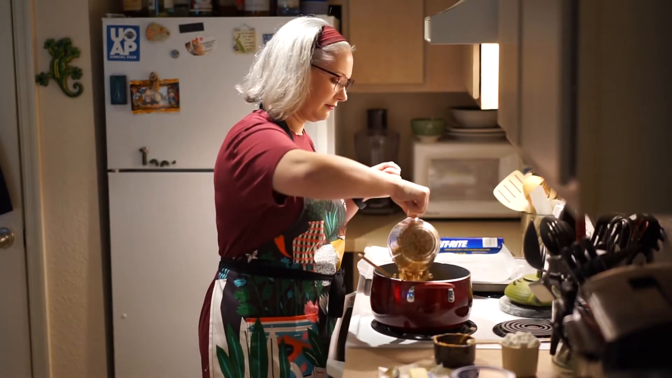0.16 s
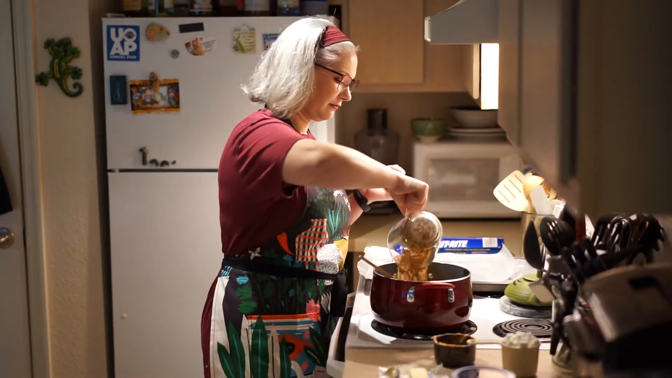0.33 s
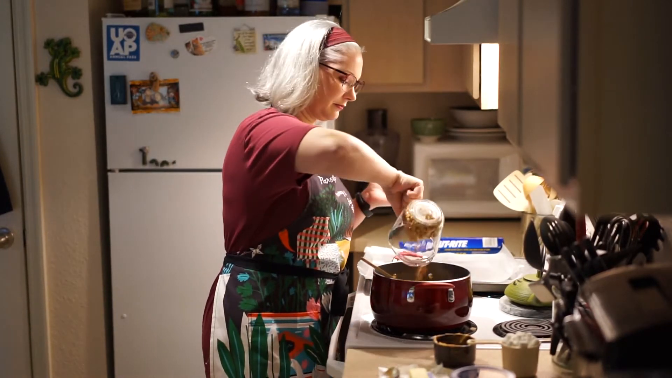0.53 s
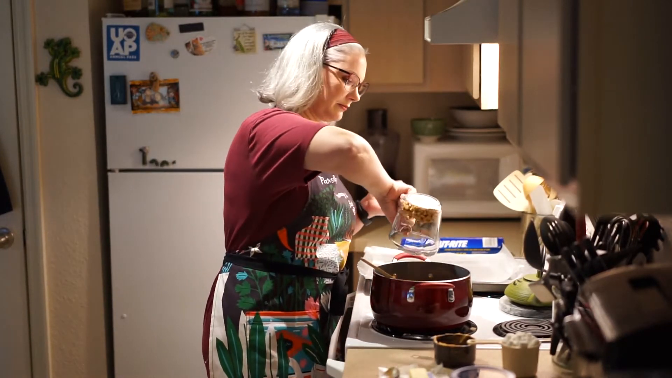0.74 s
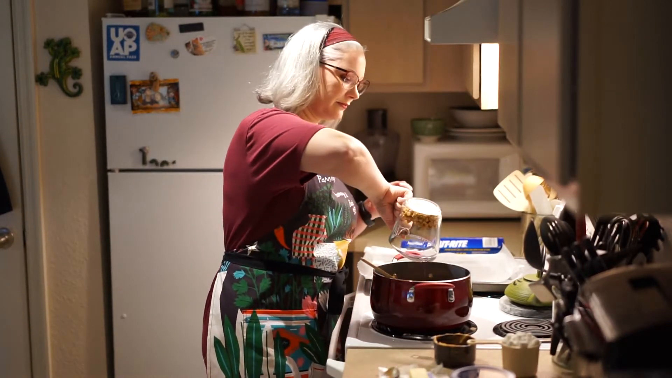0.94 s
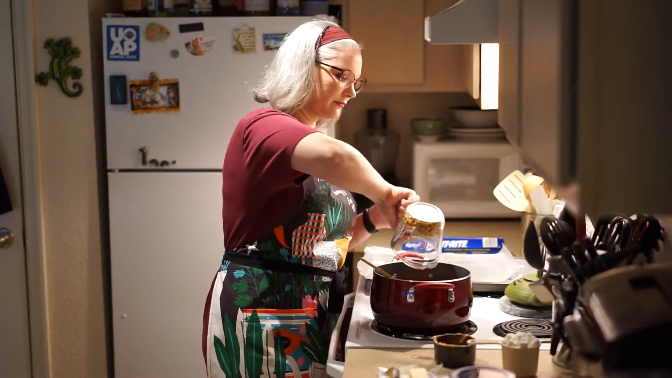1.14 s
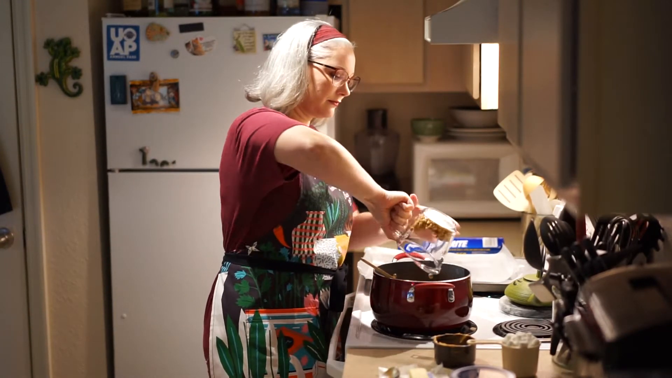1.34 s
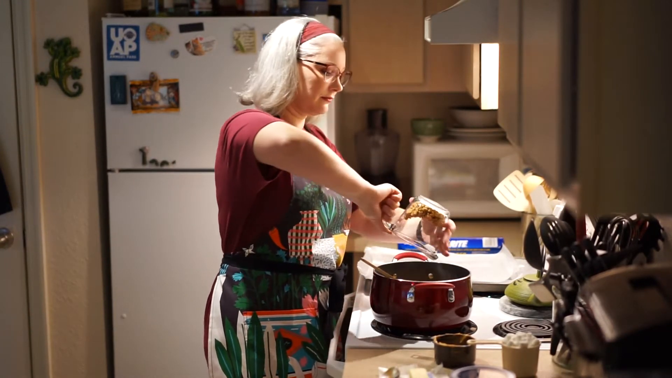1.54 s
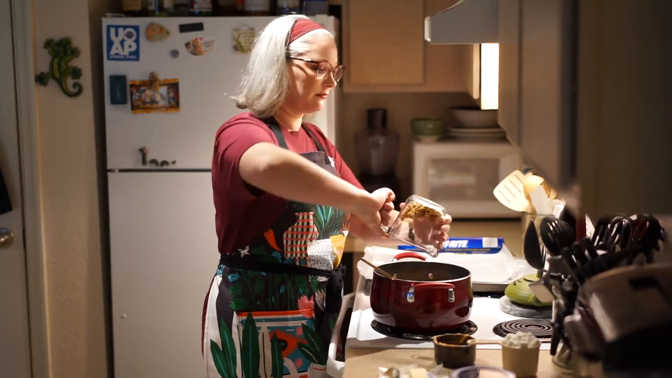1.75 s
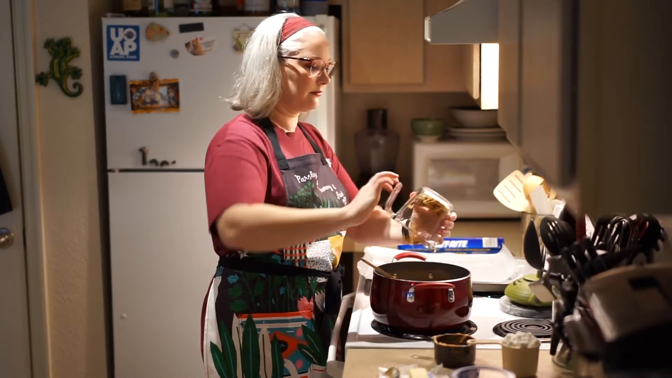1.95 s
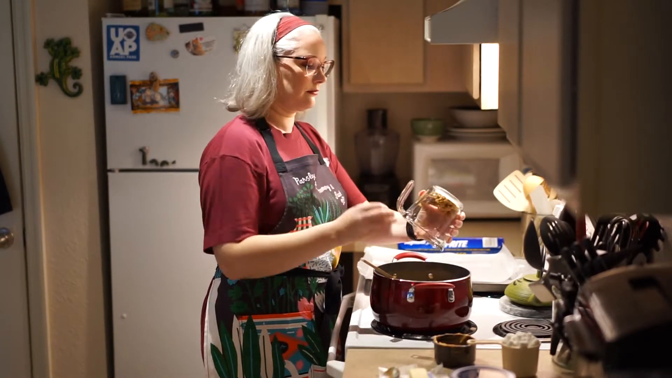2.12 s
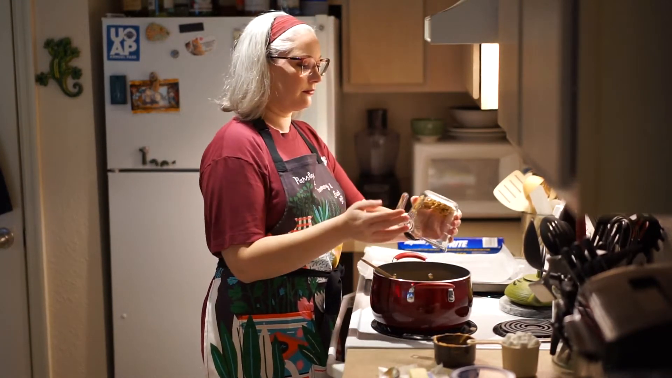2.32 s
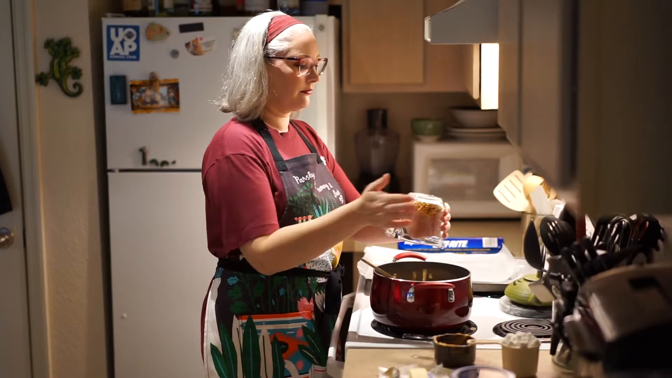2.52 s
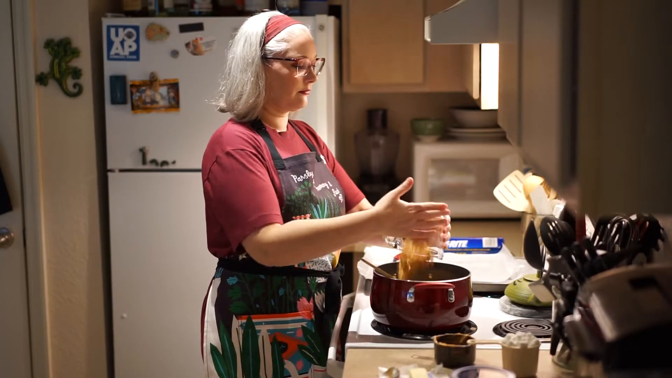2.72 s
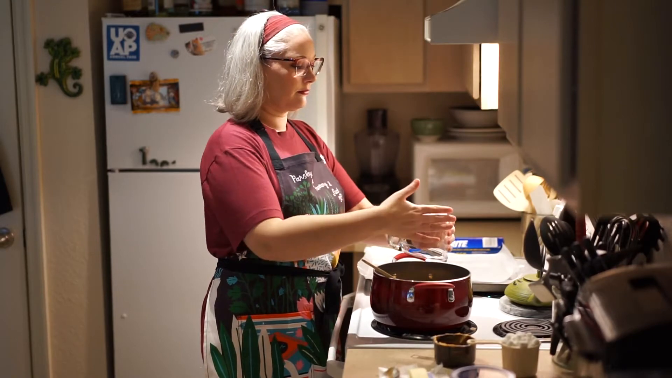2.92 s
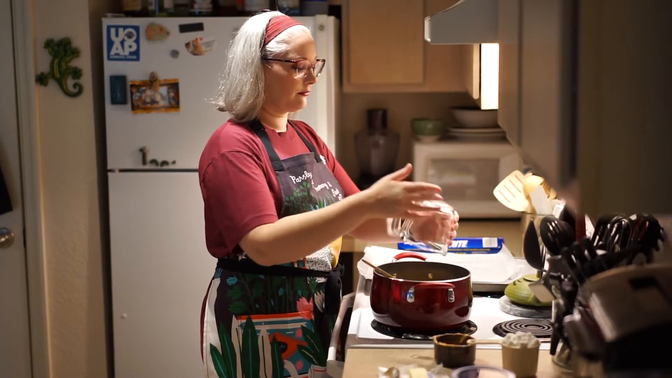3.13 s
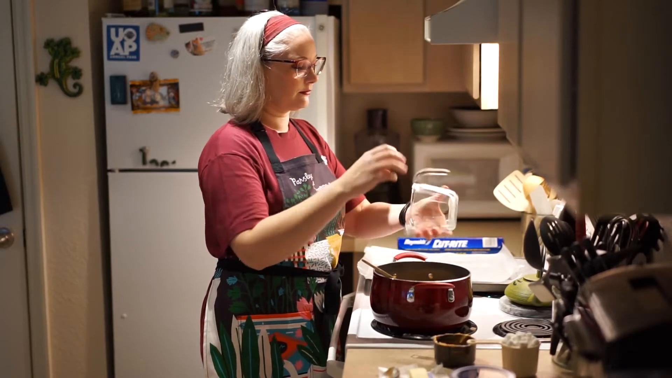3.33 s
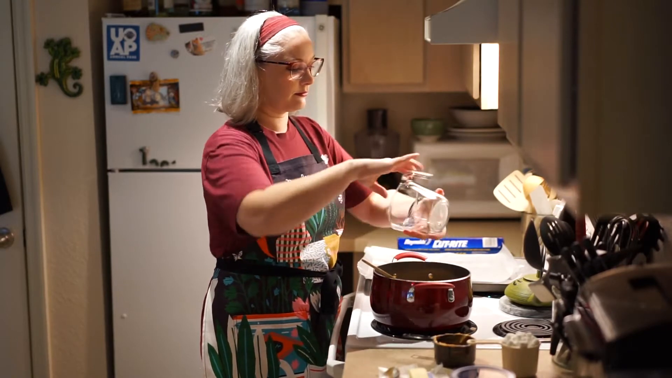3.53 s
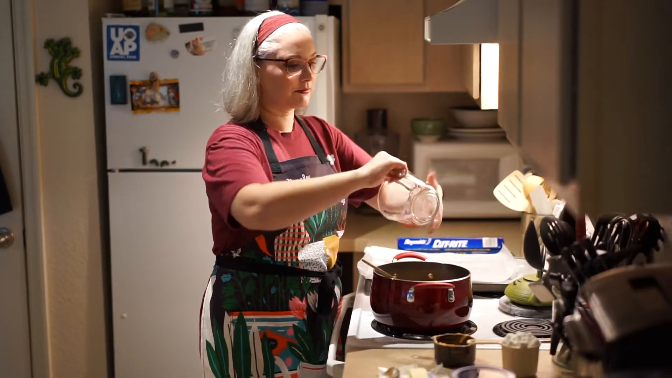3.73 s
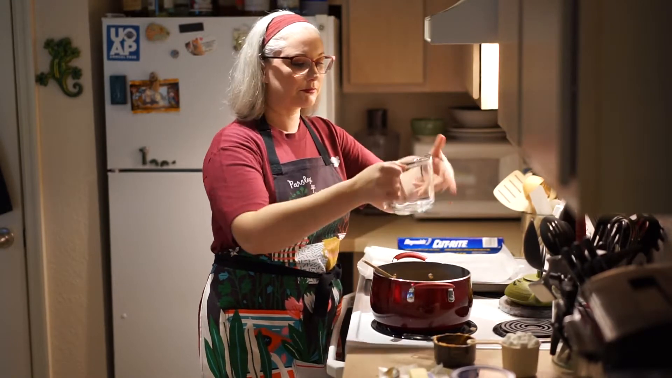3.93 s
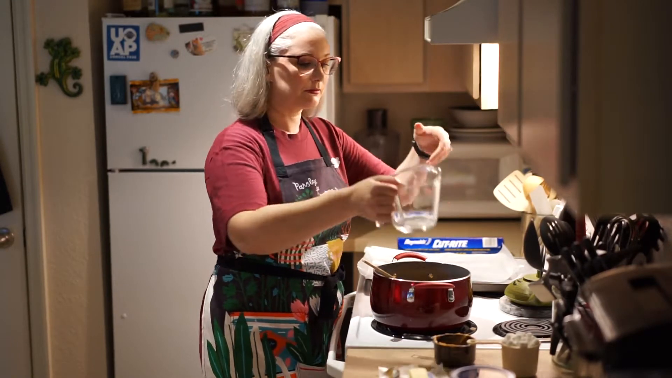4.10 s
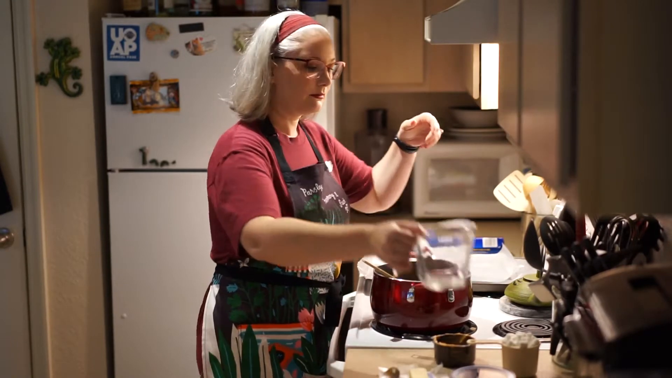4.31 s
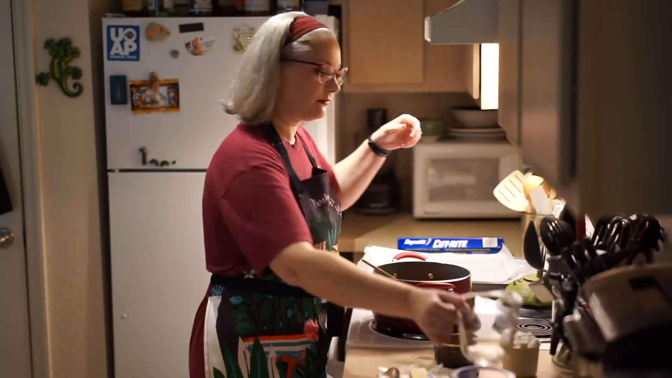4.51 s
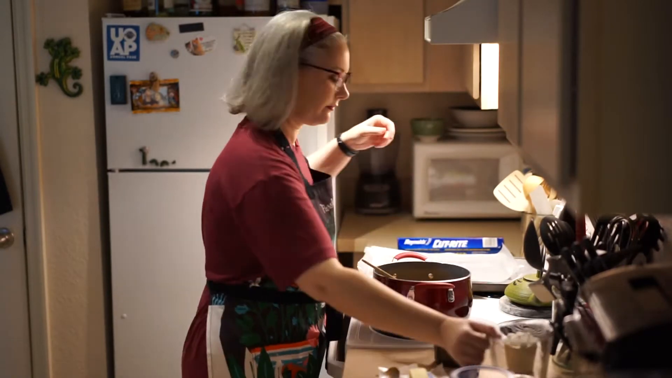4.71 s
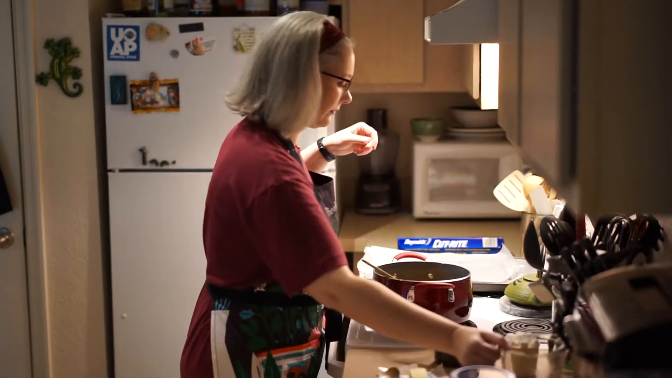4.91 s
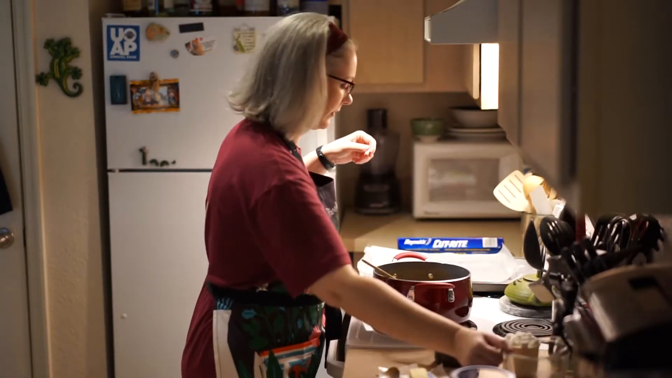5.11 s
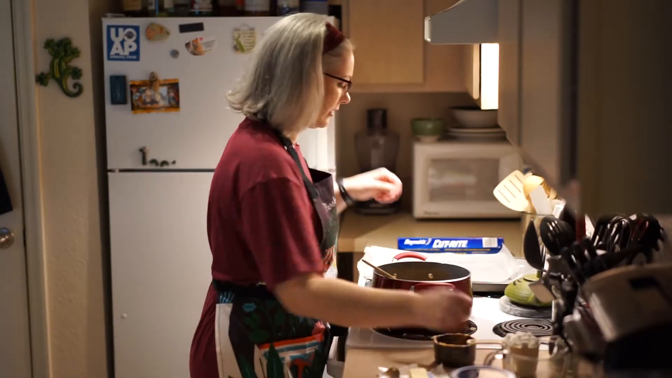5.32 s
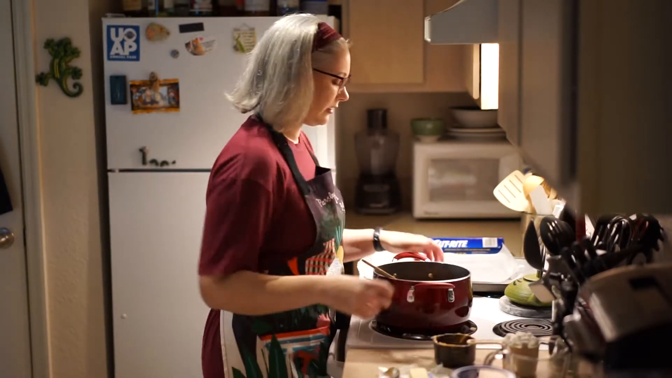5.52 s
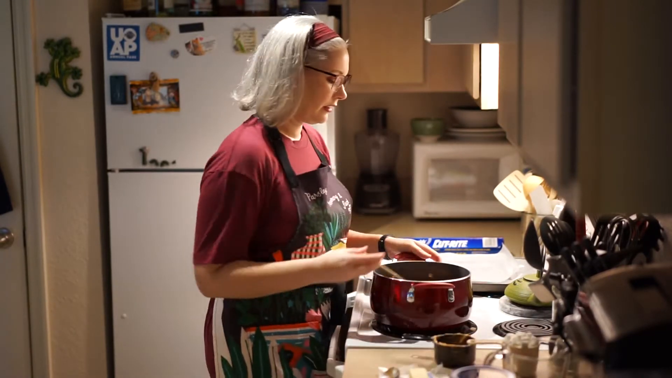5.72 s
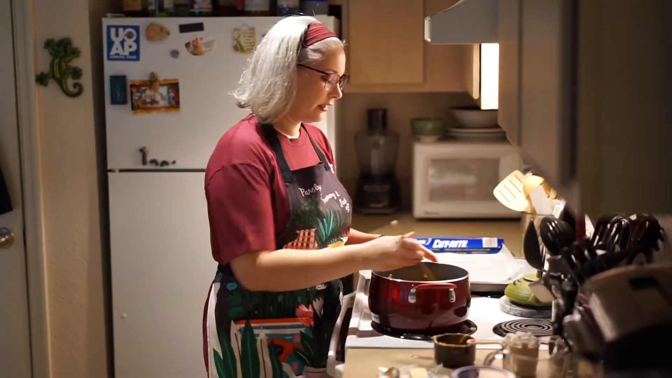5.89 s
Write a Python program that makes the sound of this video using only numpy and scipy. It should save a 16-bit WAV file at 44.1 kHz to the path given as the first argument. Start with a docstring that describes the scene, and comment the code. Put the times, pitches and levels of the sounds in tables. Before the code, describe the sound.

A small, live kitchen with a low, steady fridge hum and soft room air, heard in stereo from a few steps away. From 0 s, small hard chips pour out of a glass cup into a metal pot slightly right of centre: a dense, crisp rattle with short metallic pings and a hollow, drumming bottom whose pitch sinks as the heap cushions it. The stream thins by 0.6 s, with a strong clump at 0.7 s. Sparse clicks follow near 0.9, 1.3 and 1.6 s, then clumps at 1.9 and, heavily, 2.1 s. At about 2.6 s a palm gives the cup a short hollow pop, and the last chips crash down at 2.8-2.95 s. Near quiet follows, with a tiny tick at 4.4 s. At 4.93 s the cup is set down with a loud, sharp, woody double knock that rings briefly. Faint low footfalls come at 5.3 and 5.8 s, ending with a soft brushing near 5.87 s.

```python
"""Small hard chips rattle from a glass cup into a metal pot in a live-sounding kitchen, over a fridge's hum.
The stream thins out, stuck clumps drop one after another, and a slap of the palm frees the last of them.
The cup is set down hard on the counter, soft footfalls follow, and something brushes by the stove.
Impacts are filtered noise bursts, struck bodies are sums of decaying sines, the brushing and the room air
are shaped noise, and the fridge is a set of wavering sines."""
import sys
import numpy as np
from scipy import signal
from scipy.fft import rfft, irfft
from scipy.io import wavfile

SR = 44100
rng = np.random.default_rng(int(sys.argv[2]) if len(sys.argv) > 2 else 0)


def file_out(sig):
    """Save sig as 16-bit WAV at sys.argv[1]."""
    # one column per channel
    cols = np.atleast_2d(sig).T
    # limit, then scale
    lim = np.clip(cols, -1, 1)
    pcm = np.round(lim * 32767).astype(np.int16)
    wavfile.write(sys.argv[1], SR, pcm)


N = 262515
TIME = np.arange(N) / SR
TAIL = TIME[:SR]   # one second, the length of every impulse response

# kitchen reverberation: [f/Hz, t60/s]
ROOM_DECAY = [(80, 1), (250, 0.5), (600, 0.41), (1500, 0.35), (3500, 0.33), (7000, 0.33), (11000, 0.31),
              (16000, 0.27)]
# how alike both ears hear the reverberation: [f/Hz, likeness 0-1]
ROOM_LIKENESS = [(100, 1), (400, 0.93), (900, 0.7), (1600, 0.7), (3000, 0.12), (8000, 0.16), (16000, 0.033)]
# spectrum of the direct sound, dulled on its way: [f/Hz, level/dB]
DIRECT_SPECTRUM = [(100, -8), (500, -17.5), (1700, -4), (4000, -6), (16000, -14)]

# flow of the steady pour, thinning as the cup empties: [t/s, level/dB]
POUR_FLOW = [(0, -28), (.2, -30.5), (.35, -31.5), (.44, -31.5), (.5, -36.5), (.6, -42)]
# clumps of chips landing: [t/s, duration/s, level/dB, lower band edge f/Hz, upper band edge f/Hz]
CLUMP_LANDINGS = [(.002, 0.015, 2, 1980, 5630), (0.039, 0.019, 0.5, 1980, 5140),
                  (0.141, 0.0067, 1.5, 1990, 5300), (.170, 0.025, 3.5, 2580, 6040),
                  (.258, 0.027, 4, 2600, 6700), (.379, 0.013, -1, 2800, 6660),
                  (0.429, 0.0029, 3.5, 4500, 7460), (.610, 0.0079, 5, 2650, 6750),
                  (0.65, 0.0061, 2.5, 2580, 6300), (.669, 0.021, 6.5, 2800, 7400),
                  (.709, 0.075, 13, 3120, 7800), (.880, 0.0055, -7, 2320, 5700),
                  (.997, 0.0079, -17.5, 5010, 14100), (1.274, 0.0041, 4.5, 5450, 9000),
                  (1.333, .008, -13, 1600, 3500), (1.572, 0.0065, -11.5, 1200, 14500),
                  (1.890, .006, 6, 4460, 5500), (1.936, .05, -3.5, 2300, 6040),
                  (2.076, 0.043, 13, 3160, 7900), (2.148, .011, 7, 3960, 6400),
                  (2.579, 0.011, -18.5, 3000, 6500), (2.602, 0.015, -11, 4000, 9200),
                  (2.761, 0.012, -14, 4000, 9400), (2.797, .013, 10.5, 4130, 8700),
                  (2.810, .033, 16.5, 2880, 8800), (2.918, .003, 3, 18000, 8700),
                  (2.930, 0.028, 1, 14000, 8050)]
# spectrum radiated by the chips: [f/Hz, level/dB]
CHIP_SPECTRUM = [(100, -25.5), (350, 3), (800, 0), (1400, -4), (2100, -1.5), (3100, 0.5), (3900, -3.5),
                 (5500, -0.5), (7500, -1.5), (9500, -4.5), (12000, -7.5), (16000, -11.5)]
# modes of the pot's wall: [f/Hz, level/dB, t60/s]
POT_WALL_MODES = [(815, -15.5, 0.16), (1053, -14, 0.26), (1638, -18, 0.2), (1887, -19.5, 0.24),
                  (2595, -27, 0.086), (2856, -28.5, 0.067), (3095, -28, 0.4), (3612, -13, 0.038),
                  (5150, -20, 0.088), (6330, -16.5, 0.2)]
# modes of the pot's bottom before the load lowers them: [f/Hz, level/dB, t60/s]
POT_BOTTOM_MODES = [(489, -4.5, 0.3), (797, -37, 0.078), (1068, -9.5, 0.14), (1695, -14, 0.081)]
# modes of the heap under a 0 dB clump, a dull thud: [f/Hz, level/dB, t60/s]
HEAP_MODES = [(385, -30, 0.025), (449, -26.5, 0.041)]

# motor lines of the fridge: [f/Hz, rms level/dB]
FRIDGE_LINES = [(91.5, -55), (118.4, -57), (253.0, -62), (339.1, -64), (360.7, -66.5), (818.3, -67)]
# spectrum of the room air, relative density: [f/Hz, level per Hz/dB]
AIR_SPECTRUM = [(20, -10.5), (32, -15), (45, -6), (80, -8.5), (125, -6), (155, -11), (260, -14.5),
                (500, -14), (820, -17.5), (1050, -23.5), (1600, -27), (3000, -32), (7000, -36),
                (16000, -43)]
# how alike both ears hear the room air: [f/Hz, likeness, at most 1]
AIR_LIKENESS = [(60, 0.96), (130, 0.87), (290, 0.84), (640, 0.86), (1410, 0.5), (3100, 0.03), (6820, 0),
                (15000, -0.09)]

# light ticks of the cup as it is handled: [t/s, level/dB, f/Hz]
CUP_TICKS = [(1.168, -25.5, 8200), (1.499, -23.5, 6510), (1.500, -21.5, 3450), (4.387, -25.5, 1420)]
# touches of the palm on the cup: [t/s, level/dB]
PALM_TOUCHES = [(2.633, 4.5), (2.638, -1)]
# spectrum of the palm's pop: [f/Hz, level/dB]
PALM_SPECTRUM = [(150, -38), (380, -12), (750, -21.5), (1050, -13), (1400, 3), (2100, -7), (2900, -14.5),
                 (6500, -21), (10000, -28.5), (16000, -36)]
# modes of the cup's hollow: [f/Hz, level/dB, t60/s]
HOLLOW_MODES = [(1384, -8.5, 0.013), (1880, -9.5, 0.014)]

# cup on the counter, a graze, one edge and then the other: [t/s, level/dB]
CUP_KNOCKS = [(4.9328, 3), (4.9346, 19.5), (4.9526, 6.5)]
# spectrum of the cup's thud: [f/Hz, level/dB]
THUD_SPECTRUM = [(35, -33), (70, -14.5), (150, -12), (260, -4), (380, 1), (560, -2.5), (900, -6.5),
                 (1400, -15), (2200, -23), (3200, -31), (5000, -34), (7000, -42.5), (10000, -54),
                 (16000, -59)]
# modes of the board bouncing under the cup: [f/Hz, level/dB, t60/s]
BOARD_MODES = [(270, -24, 0.074), (391, 2, 0.025), (643, -4, 0.016)]
# modes of the counter: [f/Hz, level/dB, t60/s]
COUNTER_MODES = [(124.6, -17, 0.34), (197.7, -12, 0.74), (281.7, -8.5, 0.71), (360, -9.5, 0.24),
                 (387, 0, 0.19), (503, -13, 0.33), (557, -8, 0.27), (613, -11, 0.43), (668, -24, 0.83),
                 (747, -24, 0.32), (870, -9, 0.26), (940, -13, 0.31), (1175, -22, 0.36)]
# modes of the glass: [f/Hz, level/dB, t60/s]
GLASS_MODES = [(4500, -42, .025), (8200, -31, 0.0066), (9800, -29, 0.0049), (13800, -40, .012)]

# soft footfalls: [t/s, level/dB]
FOOTFALLS = [(5.296, -16), (5.775, -13.5), (5.81, -14)]
# modes of the floor: [f/Hz, level/dB, t60/s]
FLOOR_MODES = [(36, -3, 0.15), (50.6, -3, 0.12)]
# swell of the brushing by the stove: [t/s, level/dB]
BRUSH_LEVEL = [(0, -100), (5.76, -94), (5.81, -55), (5.87, -40.5), (5.91, -42.5), (5.95, -48.5)]
# spectrum of the brushing: [f/Hz, level/dB]
BRUSH_SPECTRUM = [(30, 8), (150, -18), (600, 0.5), (1200, -5), (2600, -3), (5000, -14.5), (9000, -20.5),
                  (16000, -44)]

SPOTS = 4   # places in the pot where chips land
LEAD_DB = 2.5   # a clump's first chip against the hardest that can follow
# chips thrown up by a clump: mean flight, strength against the clump, ratio of the band edges
REBOUND_S, REBOUND_DB, REBOUND_DULLING = 0.06, -19.5, 0.46
# a clump's first chip pings on bare metal; the pitch varies from ping to ping
PING_HZ, PING_T60_S, PING_DB, PING_SPREAD_OCTAVES = 3835, 0.023, -5.5, 0.025
COVERED_S, COVERING_S = 0.93, 0.13   # when the metal is half covered, and how gradually
# the growing load lowers the bottom's pitch: final share, time scale
LOAD_SAG, LOAD_S = 0.07, 0.27
# surges of the pour thump the bottom
FIRST_SURGE_S, SURGE_EVERY_S, SURGE_JITTER_S, SURGE_DB = 0.0418, 0.063, 0.0034, 6
# thump of a 0 dB clump before cushioning, and dB gained per dB of clump strength
CLUMP_THUMP_DB, THUMP_GROWTH = -12.5, 1.425
# the growing heap softens every thump: final loss, time scale
CUSHION_DB, CUSHION_S = 13, 0.2
HEAP_MUFFLES_DB = 5   # further loss of the higher modes, per octave, under a full cushion
AIR_DB = -48.5   # rms level of the room air
CUTOFF_HZ = 16000


def from_db(db):
    """Amplitude ratio: twenty decibels make a factor of ten."""
    return 10 ** (np.asarray(db) / 20)


def unit(x):
    """Normalization: scale to an energy of one."""
    return x / np.sqrt(np.sum(x ** 2, axis=-1, keepdims=True) + 1e-20)


def frequencies(size):
    """Discrete spectrum: the frequencies in Hz for this many samples."""
    return np.arange(size // 2 + 1) * SR / size + 1e-9


def in_time(rows, t):
    """Linear interpolation of a curve at times t."""
    return np.interp(t, *np.transpose(rows))


def at_hz(points, hz):
    """Linear interpolation of a table on a log-frequency axis."""
    f, value = np.transpose(points)
    return np.interp(np.log(hz), np.log(f), value)


def add(track, s, sound):
    """Superposition: mix a sound in at time s."""
    i = max(0, int(s * SR))
    track[i:i + len(sound)] += sound[:N - i]


def through(x, response):
    """Linear system: convolve a sound with an impulse response."""
    return signal.fftconvolve(np.atleast_2d(x), np.atleast_2d(response), axes=-1)[:, :N]


def pulse(spectrum, size=SR):
    """Minimum phase: the most compact causal pulse with this spectrum, by folding its cepstrum."""
    log_gain = np.log(from_db(at_hz(spectrum, frequencies(size))))
    cepstrum = irfft(log_gain)
    cepstrum[1:size // 2] *= 2
    cepstrum[size // 2 + 1:] = 0
    return irfft(np.exp(rfft(cepstrum)))


def fading(t60):
    """Exponential decay: 60 dB are lost in t60 seconds."""
    return np.exp(-np.log(1000) * TAIL / t60)


def ringing(modes):
    """Modal superposition: decaying sines of alternating sign, each with the energy of its row."""
    total = 0
    for k, (hz, db, t60) in enumerate(modes):
        mode = unit(np.sin(2 * np.pi * hz * TAIL) * fading(t60))
        total = total + (-1) ** k * from_db(db) * mode
    return total


def blows(rows, response):
    """Time invariance: the same body responds alike at each row's time, scaled by its strength."""
    out = np.zeros(N)
    for s, db in rows:
        add(out, s, from_db(db) * response)
    return out


def wobble(count):
    """Random modulation: straight lines between count random values of spread one."""
    return np.interp(TIME, np.linspace(0, TIME[-1], count), rng.standard_normal(count))


def diffuse(size, likeness=ROOM_LIKENESS):
    """Diffuse field: stereo noise, alike in the bass and nearly unrelated in the treble."""
    alike = np.clip(at_hz(likeness, frequencies(size)), 0, 0.999)
    mid, side = rfft(rng.standard_normal((2, size)))
    shared = np.sqrt((1 + alike) / 2) * mid
    opposed = np.sqrt((1 - alike) / 2) * side * [[1], [-1]]
    return irfft(shared + opposed, size)


def kitchen(build_s=0.0026, near_gain=2.43, near_s=0.0048):
    """Reverberation: direct sound, strong echoes off nearby surfaces, then a tail dying band by band."""
    noise, tail = rfft(diffuse(SR)), 0
    centres = np.geomspace(60, 16000, 12)
    for hz, share in zip(centres, np.eye(len(centres))):
        weight = at_hz(list(zip(centres, share)), frequencies(SR))   # overlapping triangles
        tail = tail + irfft(noise * weight, SR) * fading(at_hz(ROOM_DECAY, hz))
    build_up = 1 - np.exp(-TAIL / build_s)
    near_echoes = 1 + near_gain * np.exp(-TAIL / near_s)
    return unit(unit(tail * build_up * near_echoes) + pulse(DIRECT_SPECTRUM))


def contact(fade_s, size=1024):
    """Rough contact: a burst of tiny slips, as noise that fades at once."""
    return unit(rng.standard_normal(size) * np.exp(-TIME[:size] / fade_s))


def chip(low_hz, high_hz, ring_hz=3750, ring_octaves=0.13, ring_s=0.0014, ring_db=-1.5, size=1024):
    """Impact excitation: a chip gives a click in a broad band and a brief ring at a pitch of its own."""
    f = 1j * frequencies(size)
    top = f / high_hz
    low_cut = f / (f + low_hz)   # gentle
    high_cut = 1 / ((1 + top) * (1 + top + top ** 2))   # steep
    click = unit(irfft(rfft(contact(fade_s=0.00039)) * low_cut * high_cut))
    hz = ring_hz * 2 ** (ring_octaves * rng.standard_normal())
    ring = unit(np.sin(2 * np.pi * hz * TIME[:size]) * np.exp(-TIME[:size] / ring_s))
    excited = hz ** 2 / (hz ** 2 + low_hz ** 2)   # a thin, high click hardly wakes the ring
    return unit(click + from_db(ring_db) * excited * ring)


def spread(length, count):
    """Stratified chance: one random moment in each of count equal parts of a length."""
    return length * (np.arange(count) + rng.random(count)) / count


def stream(low_hz=2000, high_hz=7700, uneven_db=3.5, count=140):
    """Granular flow: chips of uneven size strike the heap and each other in quick succession."""
    out, length = np.zeros((SPOTS, N)), POUR_FLOW[-1][0]
    times = spread(length, count)
    uneven = np.clip(rng.standard_normal(count), -2, 1.3)
    sizes = unit(from_db(uneven_db * uneven)) * np.sqrt(length * SR)   # mean power of one
    sizes = sizes * from_db(in_time(POUR_FLOW, times))
    for k, (s, size) in enumerate(zip(times, sizes)):
        add(out[k % SPOTS], s, size * chip(low_hz, high_hz, ring_db=-19.0))
    return out


def clumps(uneven_db=11.0, count=18, rebound_count=6):
    """Impact cluster: a hard first chip, others in a quick run, then weaker, duller rebounds."""
    out = np.zeros((SPOTS, N))
    for s, length, db, low_hz, high_hz in CLUMP_LANDINGS:
        delays = spread(length, count)
        sizes = from_db(-uneven_db * rng.random(count))
        delays[0], sizes[0] = 0, from_db(LEAD_DB)
        for k, (delay, size) in enumerate(zip(delays, unit(sizes))):
            add(out[k % SPOTS], s + delay, from_db(db) * size * chip(low_hz, high_hz))

        flights = spread(2 * REBOUND_S, rebound_count)
        sizes = from_db(db + REBOUND_DB) * unit(np.exp(-flights / REBOUND_S))
        for k, (flight, size) in enumerate(zip(flights, sizes)):
            bounce = chip(low_hz * REBOUND_DULLING, high_hz * REBOUND_DULLING)
            add(out[k % SPOTS], s + length + flight, size * bounce)
    return out


def pot(wall_db=-6.0):
    """Forced vibration: clicks, with echoes for each landing spot, set the pot's wall ringing."""
    heard = sum(through(spot, kitchen()) for spot in clumps() + stream())
    clicks = through(heard, pulse(CHIP_SPECTRUM))
    return clicks + from_db(wall_db) * through(clicks, ringing(POT_WALL_MODES))


def pings(follows=0.53):
    """Local resonance: a clump's first chip rings bare metal, louder for a heavier clump."""
    out = np.zeros(N)
    for s, _, db, *_ in CLUMP_LANDINGS:
        exposed = (1 - np.tanh((s - COVERED_S) / COVERING_S)) / 2   # share of bare metal
        hz = PING_HZ * 2 ** (PING_SPREAD_OCTAVES * rng.standard_normal())
        add(out, s, exposed * from_db(PING_DB + follows * db) * ringing([(hz, 0, PING_T60_S)]))
    return out


def bare_share(s):
    """Damping by a layer: how much of the bottom the heap has yet to cushion, from 1 to 0."""
    return np.exp(-(s / CUSHION_S) ** 2)


def thumps(uneven_db=0.5, count=9):
    """Momentum transfer: surges and clump centres strike the bottom, as (t/s, level/dB) pairs."""
    jitter, uneven = rng.standard_normal((count, 2)).T
    surge_times = FIRST_SURGE_S + SURGE_EVERY_S * np.arange(count) + SURGE_JITTER_S * jitter
    surges = zip(surge_times, SURGE_DB + uneven_db * uneven)
    landings = [(s + length / 2, CLUMP_THUMP_DB + THUMP_GROWTH * db)
                for s, length, db, *_ in CLUMP_LANDINGS]
    return [(s, db - CUSHION_DB * (1 - bare_share(s))) for s, db in [*surges, *landings]]


def drumming(room, room_db=-4.0, rise_s=0.0051, jostle=1.0):
    """Mass loading: the bottom hums at a sinking pitch; blows swell it while its phase is jostled."""
    out, hits, lowest_hz = np.zeros(N), thumps(), POT_BOTTOM_MODES[0][0]
    pitch_ratio = 1 - LOAD_SAG * (1 - np.exp(-(TIME / LOAD_S) ** 2))
    load_time = np.cumsum(pitch_ratio) / SR
    for hz, db, t60 in POT_BOTTOM_MODES:
        swell = unit((1 - np.exp(-TAIL / rise_s)) * fading(t60))
        power = np.zeros(N)
        for s, strength in hits:
            muffled_db = HEAP_MUFFLES_DB * np.log2(hz / lowest_hz) * (1 - bare_share(s))
            add(power, s, (from_db(db + strength - muffled_db) * swell) ** 2)
        phase = 2 * np.pi * hz * load_time + jostle * hz / lowest_hz * wobble(count=360)
        out += np.sqrt(2 * power) * np.sin(phase)
    return out + from_db(room_db) * through(out, room)


def thuds(room):
    """Heavy damping: a clump's weight lands in the heap with a short, dull thud."""
    landings = [(s + length / 2, THUMP_GROWTH * db) for s, length, db, *_ in CLUMP_LANDINGS]
    return through(blows(landings, ringing(HEAP_MODES)), room)


def fridge(waver_rad=0.33):
    """Line spectrum: motor tones of slightly wavering phase over the broadband rush of room air."""
    hum = 0
    for hz, db in FRIDGE_LINES:
        phase = 2 * np.pi * (hz * TIME + rng.random()) + waver_rad * wobble(count=30)
        hum = hum + from_db(db) * np.sqrt(2) * np.sin(phase)
    air = through(diffuse(N, AIR_LIKENESS), unit(pulse(AIR_SPECTRUM)))
    return hum + from_db(AIR_DB) * air


def ticks(tick_t60=0.025, click_db=-3.0):
    """Light impact: each tick of the cup is a click with one brief ring."""
    out = np.zeros(N)
    for s, db, hz in CUP_TICKS:
        add(out, s, from_db(db) * ringing([(hz, 0, tick_t60)]))
        add(out, s, from_db(db + click_db) * chip(hz, hz))
    return out


def slap(near_db=0.0, pop_db=-2.5):
    """Cavity resonance: two quick touches of the palm pop the hollow cup, which faces the listener."""
    hollow = ringing(HOLLOW_MODES)
    pop = unit(unit(pulse(PALM_SPECTRUM)) + hollow)
    echoed = sum(through(blows([touch], pop), kitchen()) for touch in PALM_TOUCHES)
    return from_db(near_db) * blows(PALM_TOUCHES, hollow) + from_db(pop_db) * echoed


def knock(room, ring_db=-0.5, thud_db=0.0, press_hz=900, lowest_hz=50):
    """Coupled bodies: the thudding cup makes the board bounce; the hardest blow rings the counter."""
    thud = from_db(thud_db) * unit(pulse(THUD_SPECTRUM)) + ringing(GLASS_MODES)
    hardest = max(CUP_KNOCKS, key=lambda row: row[1])
    counter = from_db(ring_db) * blows([hardest], ringing(COUNTER_MODES))
    wood = blows(CUP_KNOCKS, ringing(BOARD_MODES)) + counter
    wood = signal.lfilter(*signal.butter(1, press_hz, fs=SR), wood)   # the wood gives way softly
    bass_cut = signal.butter(2, lowest_hz, "high", fs=SR)   # the knock carries little deep bass
    return signal.lfilter(*bass_cut, through(blows(CUP_KNOCKS, thud), room) + wood)


def footfalls():
    """Low-frequency modes: soft steps set the floor swinging."""
    return blows(FOOTFALLS, ringing(FLOOR_MODES))


def brush():
    """Friction noise: a short smooth rub, as shaped noise under a swell."""
    return from_db(in_time(BRUSH_LEVEL, TIME)) * through(diffuse(N), unit(pulse(BRUSH_SPECTRUM)))


def scene(pot_right_db=0.65):
    """Superposition in one room: level differences set the stove a little to the right."""
    room = kitchen()
    balance = from_db([[-pot_right_db], [pot_right_db]])   # left, right
    stove = (pot() + slap() + through(pings() + ticks(), room)) * balance
    pour_weight = drumming(room) + thuds(room)
    return stove + pour_weight + fridge() + knock(room) + footfalls() + brush()


def record(dry):
    """Saturation and band limiting: the highest peaks are rounded off and the top is cut."""
    rounded = dry / (1 + dry ** 6) ** (1 / 6)
    low_pass = signal.ellip(10, 0.1, 80, CUTOFF_HZ, fs=SR, output="sos")
    return signal.sosfilt(low_pass, rounded)


dry = scene()
out = record(dry)
file_out(out)
```